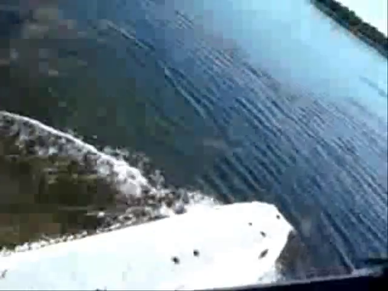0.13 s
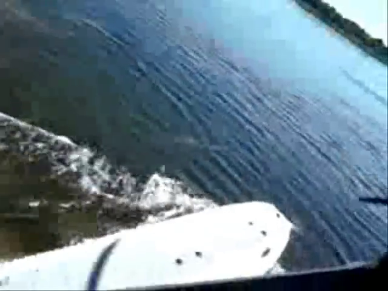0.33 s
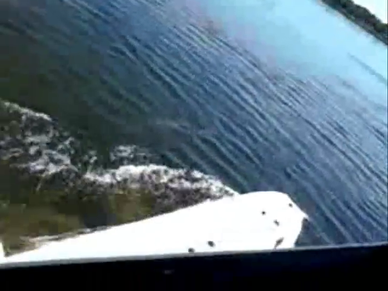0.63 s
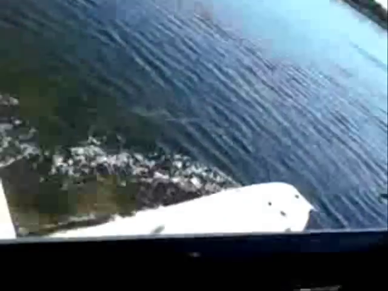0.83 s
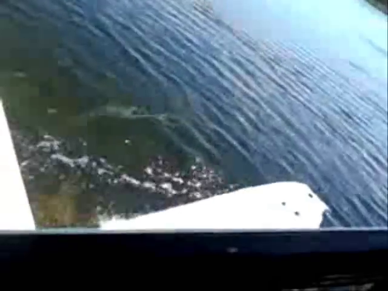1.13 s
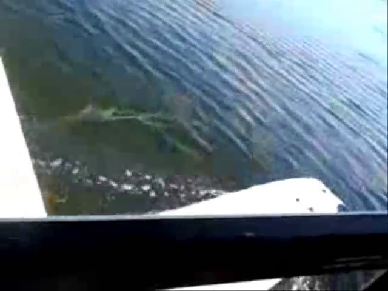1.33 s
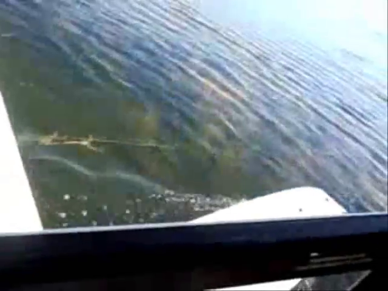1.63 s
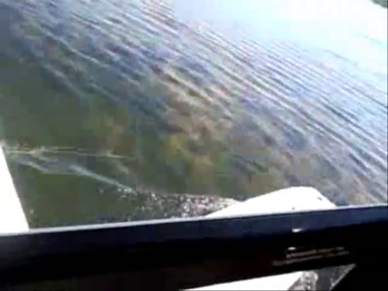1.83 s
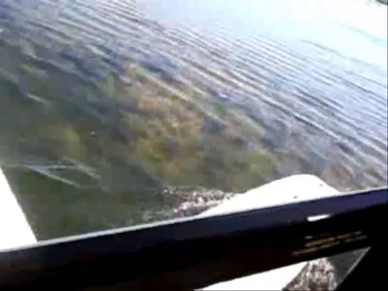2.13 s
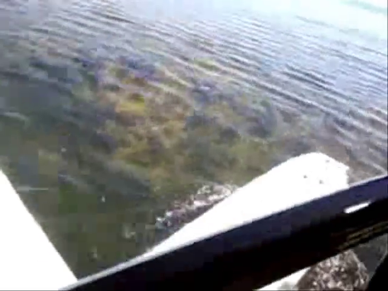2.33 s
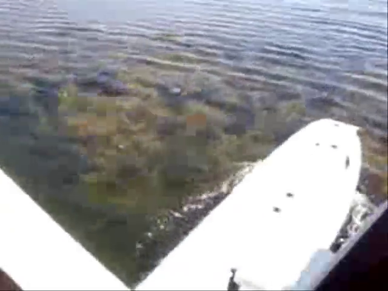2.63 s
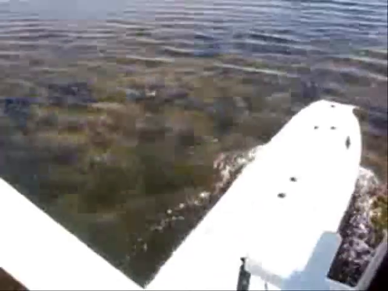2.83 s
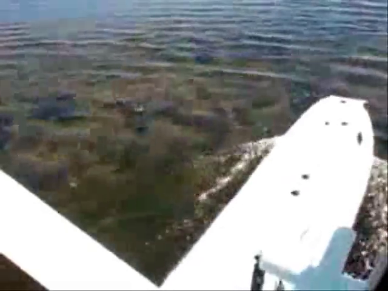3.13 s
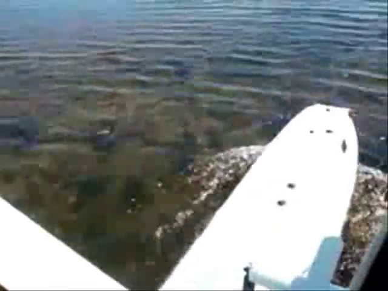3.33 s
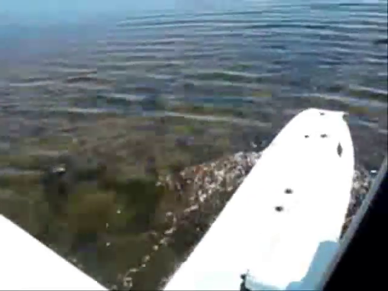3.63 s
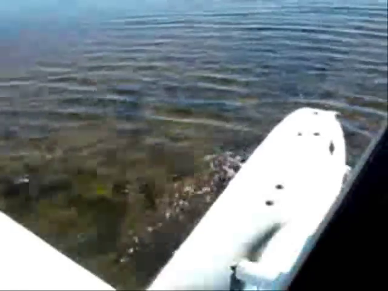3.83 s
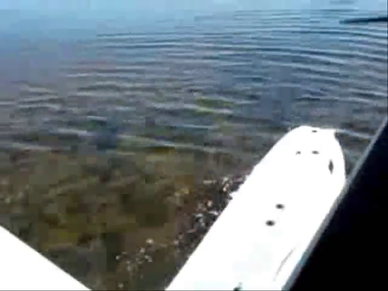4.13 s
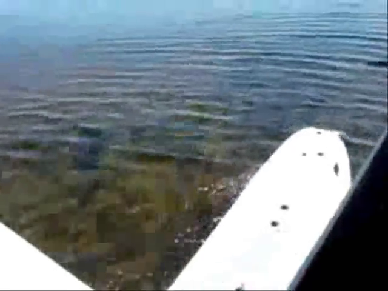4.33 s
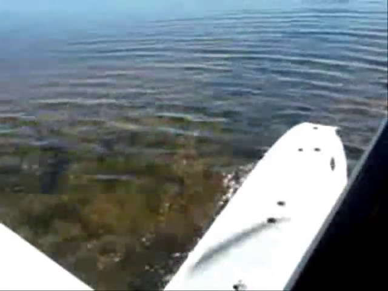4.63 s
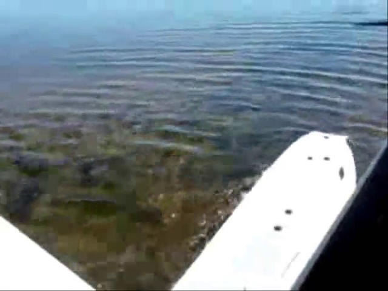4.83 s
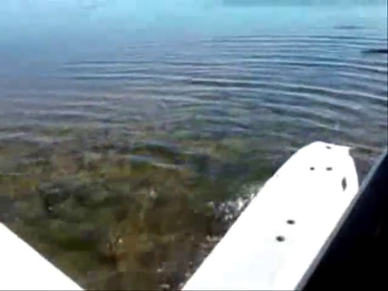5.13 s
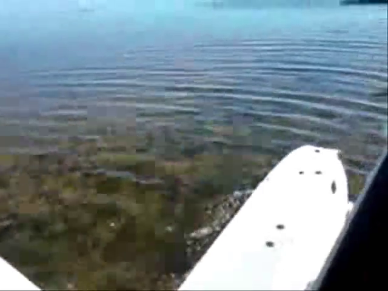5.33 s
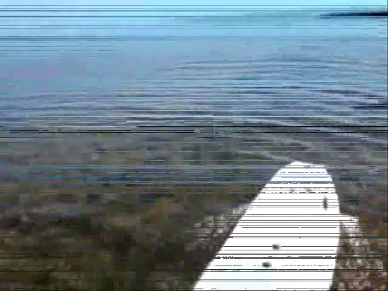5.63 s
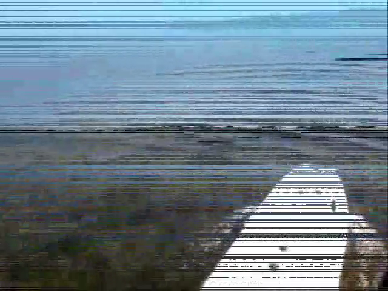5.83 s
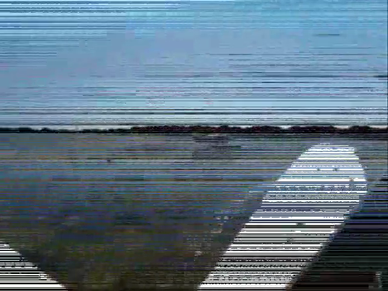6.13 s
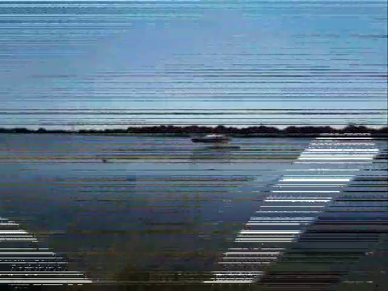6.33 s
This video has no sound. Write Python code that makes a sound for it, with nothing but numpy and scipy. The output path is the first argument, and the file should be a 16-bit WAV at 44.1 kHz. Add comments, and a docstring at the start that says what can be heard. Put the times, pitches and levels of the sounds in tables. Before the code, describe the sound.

A floatplane's piston engine idles with a low, puffing drone, heard close through a small, dull-sounding microphone at the open door. For the first 1.5 seconds, strong, fluttering gusts from the propeller hit the microphone and overload it, then thin to a few soft thuds. From about 2.3 to 2.9 seconds the engine throttles up, rising in pitch and loudness with a flare of rasp, and then holds a faster, throbbing drone with a barking exhaust. The wind buffeting returns, a little deeper, from about 2.7 to 4.1 seconds, then drops to occasional bumps. Water washes faintly and steadily along the float underneath. From about 5.5 seconds a light, rapid knocking from the engine cover grows, and a few more gusts arrive around 6 seconds, as the whole sound fades toward the end at about 6.5 seconds.

```python
"""Floatplane taxiing, door open

A four-cylinder engine idles, then is throttled up: crank drone, exhaust puffs, rasp, cowling knocks, hum.
Gusts of propeller wash hit the microphone and overload it. Shallow water washes along the float.
A small camera narrows the band; the sound fades at the end."""
import sys
import numpy as np
from scipy import signal
from scipy.fft import rfft, irfft, next_fast_len
from scipy.io import wavfile
from scipy.ndimage import uniform_filter1d, map_coordinates

SR = 44100
rng = np.random.default_rng(int(sys.argv[2]) if len(sys.argv) > 2 else 0)


def unload_audio(sound):
    """Save the sound as a 16-bit wav file, at the path given as the first command line argument."""
    columns = np.transpose(np.atleast_2d(sound))
    # keep every value between -1 and 1, then stretch to whole-number steps
    steps = np.round(np.clip(columns, -1, 1) * 32767)
    wavfile.write(sys.argv[1], SR, steps.astype(np.int16))


N = 285710
TIME_S = np.arange(N) / SR

# crankshaft orders (multiple of turn rate [1], level [dB])
CRANK_ORDERS = [(1, -4.5), (1.5, -3), (2, 1.5), (2.5, -8), (3, -9.5), (3.5, -7), (4, -8.5), (6, -13),
                (8, -11.5), (10, -15.5), (12, -19.5)]
# slow changes in how loud the engine comes across (time [s], drone [dB], bark and rasp [dB])
ENGINE_PRESENCE = [(0, -4.5, -2), (1.4, -1, -3), (1.75, -1.5, -3), (2.5, -1, 0), (3.2, -2, -1.5),
                   (3.9, 1, -2.5), (4.45, -1, 0), (5.2, -1.5, .5), (5.6, -1.5, 2), (5.95, 0.5, -2.5),
                   (6.25, 0.5, 0), (6.48, -8.5, 0.5)]
# exhaust spectrum (frequency [Hz], density [dB])
EXHAUST_SPECTRUM = [(30, -18.5), (80, -6.5), (170, 3), (350, 4), (470, -8.5), (620, -1), (880, 0.5),
                    (1200, -6.5), (1600, -17), (2300, -11), (3200, -34), (5000, -43)]
# rasp spectrum (frequency [Hz], density [dB])
RASP_SPECTRUM = [(300, -22), (900, -11.5), (1250, 0.5), (1550, 1), (2050, -5), (2600, -9), (3200, -14),
                 (4000, -29), (5000, -16.5)]
# knock envelope (time [s], level [dB])
KNOCK_LEVELS = [(2.2, -37.5), (2.8, -41), (5.5, -35), (6.1, -25), (6.3, -23)]
# cowling modes (frequency [Hz], level [dB], T60 [s])
COWLING_MODES = [(470, -6.5, 0.089), (610, -5.5, .04), (694, -2.5, 0.02), (1325, 2, 0.015),
                 (1572, -3, 0.025), (1710, 2.5, 0.014), (2760, -16.5, 0.012), (4020, -13, 0.0098)]
# propeller gusts (start [s], end [s], strength [dB])
PROP_GUSTS = [(0, 0.022, 2), (0.033, 0.145, -3.5), (0.154, 0.274, -3.5), (.29, 0.432, -3.5),
              (.474, 0.544, -2), (.586, 0.591, -4.5), (.614, 0.639, -12), (0.65, 0.697, -2),
              (0.749, 0.897, -3), (0.918, 0.926, -5.5), (0.947, .975, -9), (1.01, 1.148, -6),
              (1.177, 1.191, -3), (1.212, 1.307, -2), (1.339, 1.359, -8.5), (1.362, 1.386, 1),
              (1.466, 1.491, -6.5), (1.509, 1.542, -3), (1.586, 1.605, -11), (1.64, 1.654, -9),
              (1.729, 1.737, -12), (1.82, 1.845, -10.5), (1.954, 1.964, -13.5), (2.095, 2.122, -10.5),
              (2.454, 2.473, -10.5), (2.69, 2.869, -6), (2.921, 3.001, -7.5), (3.029, 3.053, -2.5),
              (3.095, 3.16, -4), (3.199, 3.267, -2), (3.299, 3.341, -8), (3.425, 3.456, -4),
              (3.537, 3.597, -10.5), (3.624, 3.664, -9.5), (3.671, 3.675, 2.5), (3.69, 3.748, -5.5),
              (3.821, 3.823, -2), (3.924, 3.94, -5.5), (3.955, 3.981, -10), (4.005, 4.025, 0),
              (4.06, 4.114, -11.5), (4.192, 4.216, -12.5), (4.345, 4.384, -11), (4.447, 4.465, -11),
              (4.75, 4.766, -14), (5.881, 5.943, -9.5), (5.966, 6.053, -9.5), (6.172, 6.191, -10)]
# draught between gusts (time [s], level [dB])
DRAUGHT_LEVELS = [(0, -12), (1.3, -13.5), (1.7, -25.5), (1.95, -22.5), (2.3, -27.5), (2.8, -11), (3.4, -17),
                  (4.1, -17), (4.6, -28), (5.7, -29), (6.0, -18.5), (6.48, -33)]
# eddy spectrum at 300 Hz nominal pitch (frequency [Hz], density [dB])
EDDY_SPECTRUM = [(20, -4.5), (150, 1), (300, -3), (500, -5.5), (900, -14), (1600, -22), (3000, -31.5),
                 (5000, -42)]
# bow wave spectrum (frequency [Hz], density [dB])
WATER_SPECTRUM = [(100, -5), (400, 18.5), (900, 8), (2000, -18.5), (3200, -21), (5000, -28)]
# camera response (frequency [Hz], gain [dB])
CAMERA_RESPONSE = [(20, -17.5), (45, -8.5), (90, 1.5), (2800, 0.5), (3400, 0.5), (4000, -7.5), (4700, -15),
                   (5100, -29), (5500, -73)]

# engine layer base gains (idle [dB], throttled up [dB], extra per unit strain [dB])
DRONE_DB = (-24.5, -17.5, 7.5)
BARK_DB = (-33, -22, 16)
RASP_DB = (-40.5, -26.5, -2.5)
CHIRP_DB = (-37, -34.5, 5)
HUM_DB = (-32.5, -47, 9.5)


def engine(idle_firing_hz=54, run_firing_hz=95, jitter=0.00498, flare_db=9, flare_s=2.563, flare_width_s=0.22):
    """Four cylinders, two firings a turn; the rasp throbs each turn and flares with the throttle push."""
    throttle, speed = throttle_and_speed()
    strain = throttle - speed  # labours while gathering speed

    def gain(idle_db, open_db, strain_db):
        return amp(idle_db + (open_db - idle_db) * throttle + strain_db * strain)

    firing_hz = idle_firing_hz + (run_firing_hz - idle_firing_hz) * speed
    turns = np.cumsum(firing_hz * (1 + jitter * wobble(12))) / SR / 2
    rasp = gain(*RASP_DB) * coloured(patchy_noise(), RASP_SPECTRUM) + gain(*CHIRP_DB) * chirps()
    flare = amp(flare_db * np.exp(-((TIME_S - flare_s) / flare_width_s) ** 2))
    throb = unit(amp(0.5 * np.cos(2 * np.pi * turns)))
    drone_drift_db, growl_drift_db = curves(ENGINE_PRESENCE)
    growl = amp(growl_drift_db) * (gain(*BARK_DB) * exhaust_bark(turns) + rasp * flare * throb)
    drone = amp(drone_drift_db) * gain(*DRONE_DB) * crank_drone(turns)
    knocks = amp(curves(KNOCK_LEVELS)[0]) * cowling_knocks(turns)
    hum = gain(*HUM_DB) * unit(np.sin(2 * np.pi * 16 * turns))
    return drone + growl + knocks + hum


def throttle_and_speed(push_s=(2.33, 2.73), lag_s=0.2):
    """Throttle ramp and lagging crank speed, both 0 (idle) to 1."""
    throttle = np.interp(TIME_S, push_s, [0, 1])
    pole = np.exp(-1 / (lag_s * SR))
    return throttle, signal.lfilter([1 - pole], [1, -pole], throttle)


def crank_drone(turns):
    """Low crank orders; the weak ones sway most in the moving air."""
    drone = np.zeros(N)
    for order, db in CRANK_ORDERS:
        sway_db = min(1.4 - db / 5, 3.2)
        gain = amp(db + sway_db * wobble(11))
        phase = 2 * np.pi * (order * turns + rng.random()) + 0.21 * sway_db * wobble(24)
        drone += gain * np.sin(phase)
    return unit(drone)


def exhaust_bark(turns, hiss_gain=1.72, ring_s=0.014, alternate_db=1.5, scatter_db=3):
    """One puff per firing: each cylinder rings the pipe its own way, with gas hiss on top."""
    firings = np.flatnonzero(np.diff(np.floor(2 * turns)))
    t = np.arange(SR // 20) / SR
    pipes = rng.standard_normal((2, len(t)))  # one per cylinder pair
    rings = np.tile(pipes, (2, 1)) + 0.5 * rng.standard_normal((4, len(t)))
    cylinder = np.arange(len(firings)) % 4
    hiss = hiss_gain * rng.standard_normal((len(firings), len(t)))
    puffs = (rings[cylinder] + hiss) * np.exp(-t / ring_s)
    gains = amp(alternate_db * (cylinder % 2) + rng.normal(0, scatter_db, len(firings)))
    return coloured(overlap_add(firings, puffs * gains[:, None]), EXHAUST_SPECTRUM)


def chirps(low_hz=1200, high_hz=2200, width_s=0.014, fall_per_s=1.3, blur_rad=0.085, count=800):
    """Short, blurred, falling chirps that overlap in the rasp."""
    out = np.zeros(N + SR)
    t = np.arange(SR // 6) / SR - 1 / 12
    envelope = np.exp(-(t / width_s) ** 2)
    for when, height, size in rng.random((count, 3)):
        hz = (low_hz + (high_hz - low_hz) * height) * np.exp(-fall_per_s * t)
        phase = 2 * np.pi * np.cumsum(hz) / SR + blur_rad * np.cumsum(rng.standard_normal(len(t)))
        at = int(when * (N + len(t)))
        out[at:at + len(t)] += amp(19 * size) * envelope * np.sin(phase)
    return unit(out[len(t):][:N])


def cowling_knocks(turns, scatter_db=2, detune=0.039, attack_s=0.00079):
    """One soft blow per turn rings the cowling; mode strengths vary per blow."""
    hits = np.flatnonzero(np.diff(np.floor(turns)))
    t = np.arange(SR // 20) / SR
    per_hit = lambda spread: rng.normal(0, spread, (len(hits), 1))
    rings = np.zeros((len(hits), len(t)))
    for hz, db, t60_s in COWLING_MODES:
        envelope = amp(db + per_hit(scatter_db) - 60 * t / t60_s)
        cycles = hz * t * (1 + per_hit(detune)) + per_hit(0.12)
        rings += envelope * np.sin(2 * np.pi * cycles)
    attack = 1 - np.exp(-(t / attack_s) ** 2)
    return unit(overlap_add(hits, rings * attack))


def propeller_wash(eddy_hz=447, db_per_octave=13.5, mic_turn_s=(2.3, 2.9), trim_db=-0.5):
    """Fluttering gusts over a lumpy draught; stronger gusts sound higher."""
    gusts = np.zeros(N + SR)
    flutter = amp(3 * wobble(160) + 0.65 * wobble(50))
    for start_s, end_s, db in PROP_GUSTS:
        at = int(start_s * SR)
        turn_octaves = np.interp(start_s, mic_turn_s, [0, -0.5])  # microphone turns: eddies sound lower
        pitch_hz = eddy_hz * 2 ** (db / db_per_octave + turn_octaves)
        tilt_db_per_octave = 0.95 * min(db + 7, 0)  # weak gusts are round thuds
        puff = gust(end_s - start_s, pitch_hz, tilt_db_per_octave, flutter[at:])
        gusts[at:at + len(puff)] += amp(db + trim_db) * puff
    draught = unit(turbulence(N, pitch_hz=166) * amp(5.3 * wobble(35)))
    return gusts[:N] + amp(curves(DRAUGHT_LEVELS)[0]) * draught


def gust(length_s, pitch_hz, tilt_db_per_octave, flutter, rise_s=0.0018, fall_s=0.0089, front_s=0.016):
    """Strikes with a front of small bright eddies, flutters, drops away."""
    length_s = max(length_s, rise_s)
    t = np.arange(int(length_s * SR) + SR // 25) / SR
    envelope = np.minimum(t / rise_s, 1) * np.exp(-np.maximum(t - length_s, 0) / fall_s)
    body = turbulence(SR // 2, pitch_hz, tilt_db_per_octave)[:len(t)]
    front = turbulence(SR // 2, pitch_hz * 2 ** 0.96, tilt_db_per_octave)[:len(t)]
    eddies = (body + amp(-4) * np.exp(-t / front_s) * front) * flutter[:len(t)]
    rms = np.sqrt(np.average(eddies ** 2, weights=envelope ** 2))
    return eddies * envelope / rms


def turbulence(samples, pitch_hz, tilt_db_per_octave=0, nominal_hz=300, port_hz=85):
    """Eddy pressure on the microphone: smaller eddies sound higher; the port sheds deep bass."""
    def response(hz):
        port = hz ** 2 / np.sqrt(hz ** 4 + port_hz ** 4)
        treble_tilt = amp(tilt_db_per_octave * np.log2(np.hypot(1, hz / 900)))
        return gain_at(EDDY_SPECTRUM, hz * nominal_hz / pitch_hz) * port * treble_tilt

    return unit(filtered(rng.standard_normal(samples), response))


def bow_wave(level_db=-35, sway_db=0.98):
    """Water washing along the float."""
    return amp(level_db + sway_db * wobble(6.3)) * coloured(patchy_noise(), WATER_SPECTRUM)


def amp(db):
    """dB to gain."""
    return 10 ** (np.asarray(db) / 20)


def unit(x):
    """Scale to rms 1."""
    return x / np.sqrt(np.mean(x ** 2) + 1e-20)


def gain_at(points, hz):
    """Gain from (frequency [Hz], level [dB]) points, log axis."""
    points_hz, db = np.transpose(points)
    return amp(np.interp(np.log(hz + 1), np.log(points_hz + 1), db))


def curves(rows):
    """Per-sample curve for each column after time."""
    times_s, *columns = np.transpose(rows)
    return [np.interp(TIME_S, times_s, column) for column in columns]


def wobble(rate_hz):
    """Smooth random curve, knots at rate_hz."""
    knots = rng.standard_normal(int(N * rate_hz / SR) + 4)
    return map_coordinates(knots, [TIME_S * rate_hz])


def overlap_add(starts, rows):
    """Sum the rows, each from its start sample."""
    indices = starts[:, None] + np.arange(rows.shape[1])
    return np.bincount(indices.ravel(), rows.ravel(), N)[:N]


def filtered(x, response):
    """Zero-phase filter, gain response(hz)."""
    size = next_fast_len(len(x) + 8192)
    return irfft(rfft(x, size) * response(np.fft.rfftfreq(size, 1 / SR)), size)[:len(x)]


def coloured(x, spectrum):
    """Shape by a spectrum, rms 1."""
    return unit(filtered(x, lambda hz: gain_at(spectrum, hz)))


def patchy_noise(depth_db=4):
    """White noise with random-gain patches, about 250 Hz by 45 ms."""
    bins = signal.stft(rng.standard_normal(N), nperseg=512)[2]
    patches = uniform_filter1d(rng.standard_normal(bins.shape), size=3, axis=0)
    patches = uniform_filter1d(patches, size=8, axis=1)
    return unit(signal.istft(bins * amp(depth_db * unit(patches)), nperseg=512)[1][:N])


def saturated(x, ceiling, hardness):
    """Round off peaks at the ceiling."""
    return x / (1 + np.abs(x / ceiling) ** hardness) ** (1 / hardness)


def scene():
    """Engine, propeller wash and water; mono."""
    return (engine() + propeller_wash() + bow_wave())[None]


def record(dry, fade_s=(5.89, 6.74), cutoff_hz=15300):
    """Input overload, camera band, overshoot limiting, fade, low-pass."""
    x = saturated(dry[0], ceiling=0.91, hardness=19)
    x = filtered(x, lambda hz: gain_at(CAMERA_RESPONSE, hz))
    x = saturated(x, ceiling=0.95, hardness=60)
    x = x * np.interp(TIME_S, fade_s, [1, 0])
    return filtered(x, lambda hz: hz < cutoff_hz)[None]


dry = scene()
out = record(dry)
unload_audio(out)
```